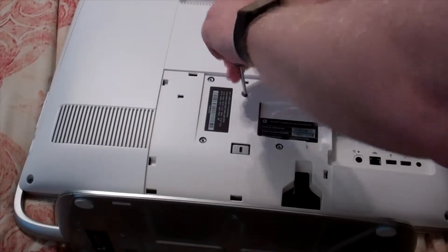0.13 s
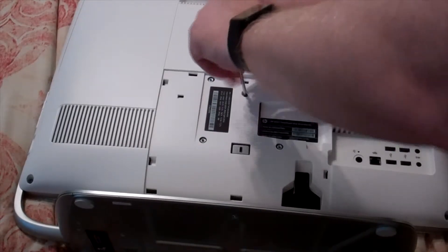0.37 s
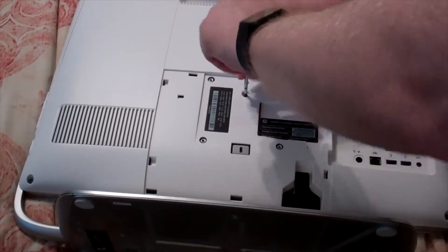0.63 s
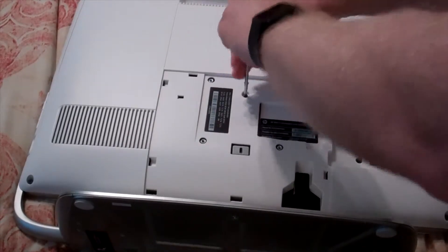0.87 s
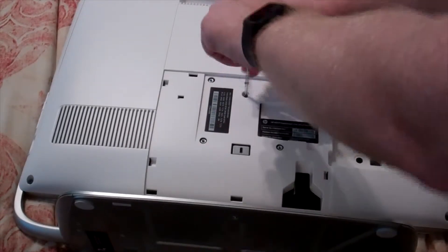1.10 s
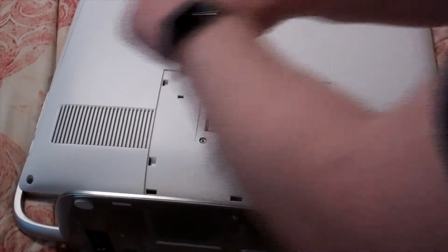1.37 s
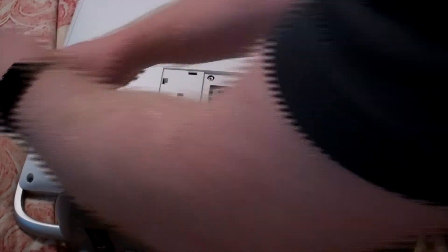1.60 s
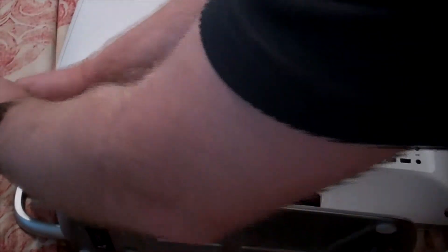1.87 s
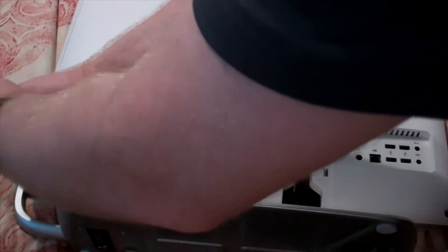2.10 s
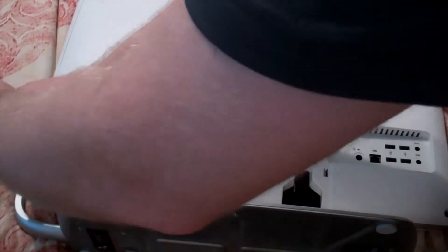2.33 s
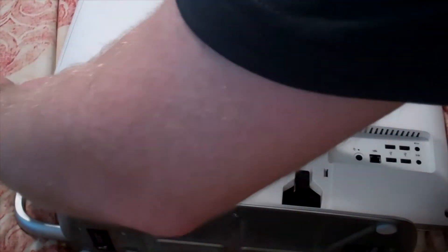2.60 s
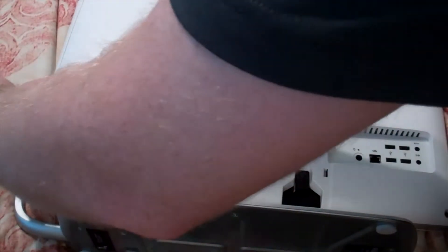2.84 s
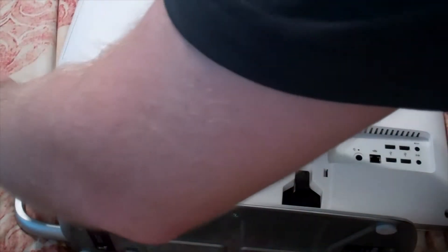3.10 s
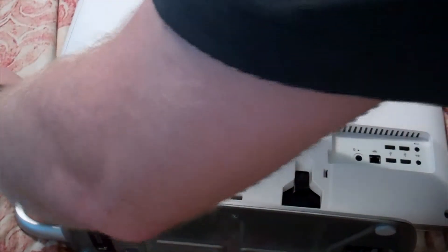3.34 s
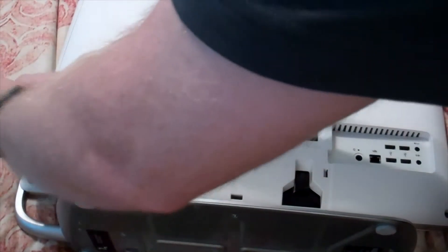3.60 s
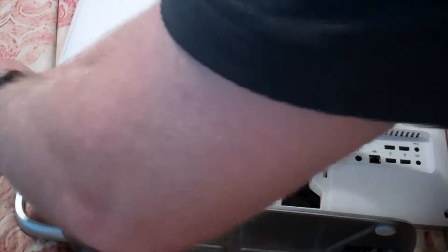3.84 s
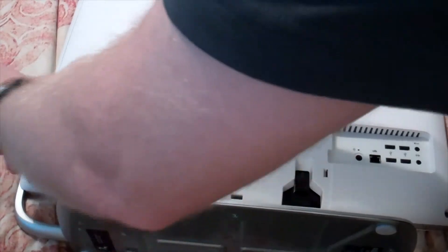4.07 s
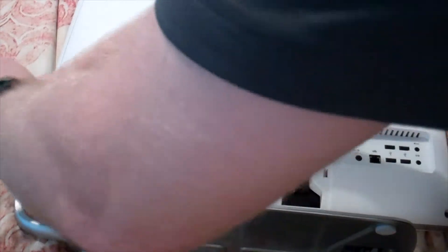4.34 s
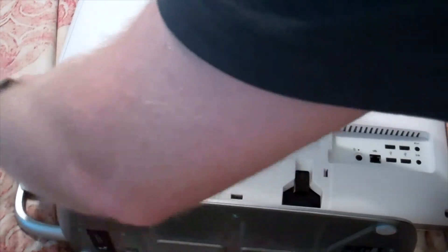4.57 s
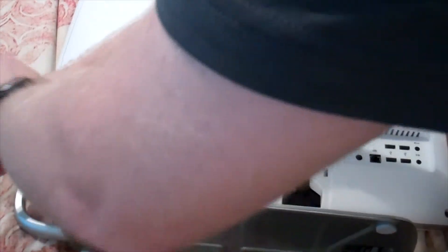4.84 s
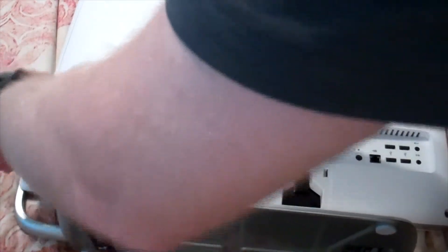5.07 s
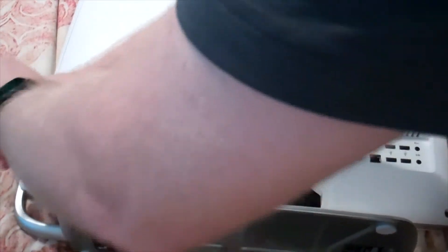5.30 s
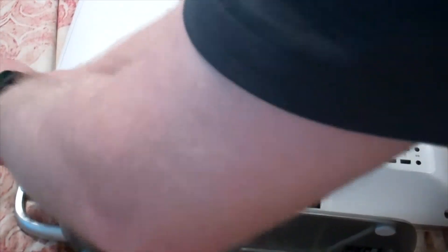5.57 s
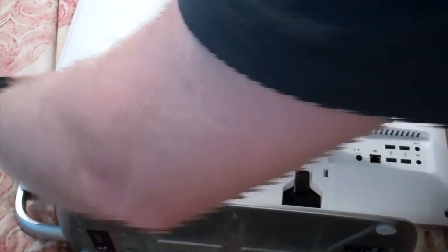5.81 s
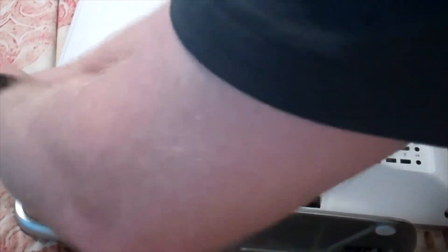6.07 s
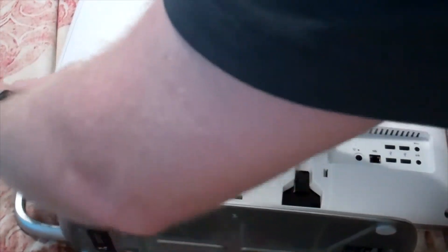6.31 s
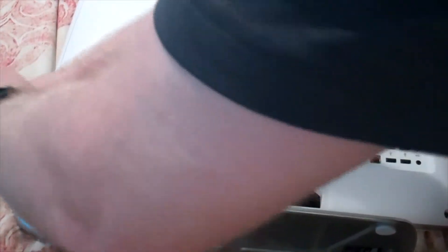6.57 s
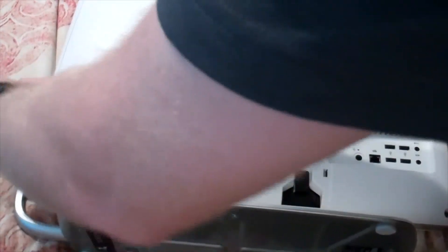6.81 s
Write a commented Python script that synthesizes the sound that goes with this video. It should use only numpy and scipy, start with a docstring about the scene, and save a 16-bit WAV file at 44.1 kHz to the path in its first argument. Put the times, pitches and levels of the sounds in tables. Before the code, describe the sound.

Close stereo microphone in a quiet furnished room with steady hiss and a faint high whine. A screwdriver bit rubs faintly in a screw, then snaps loudly twice on a hollow plastic case. A sleeve swishes past, followed by clustered taps and short scrapes, a sparse softer stretch, and finally spaced hard cracks with small clicks between them.

```python
"""A small screwdriver backs screws out of the plastic cover of a hollow case: its bit slips and snaps,
taps and scrapes. Each touch is a rough push that sets case, cover, bit and steel ringing as dying sines.
Dragging is many tiny slips; thread squeaks are narrow noise; a sleeve swishes past once as cloth noise.
Sparse echoes make a quiet furnished room, over steady hiss and a faint high whine.
The close stereo microphone's level ducks after loud snaps, and the highest peaks clip."""
import sys
import numpy as np
from scipy import signal
from scipy.io import wavfile
from scipy.ndimage import uniform_filter1d

SR = 44100
rng = np.random.default_rng(int(sys.argv[2]) if len(sys.argv) > 2 else 0)


def put_to_file(sound):
    """Save the sound as 16-bit audio at rate SR, in the file named by the first command-line argument."""
    columns = np.atleast_2d(sound).T  # one column per channel
    safe = np.clip(columns, -1, 1)
    whole_steps = np.round(safe * 32767)
    wavfile.write(sys.argv[1], SR, whole_steps.astype(np.int16))


def decibels_to_gain(level_db):
    """Convert a level in decibels to a linear amplitude gain (20 dB per decade)."""
    exponent = np.asarray(level_db, float) / 20
    return 10 ** exponent


N = 305602

# single contacts: t/s, knock of the cover/dB, boom of the hollow case/dB, snap of steel on steel/dB
TOUCHES = [(0.169, -42, -43.5, -43.5), (0.23, -43, -35.5, -46), (0.272, -36.5, -42, -42.5),
           (0.609, -14.5, -13.5, -3.5), (0.95, -49, -42.5, -47), (1.033, -13.5, -15, -4),
           (1.146, -43.5, -61, -36.5), (1.876, -30, -24, -42), (1.955, -33.5, -31, -43),
           (1.988, -20.5, -22.5, -28.5), (2.064, -34.5, -39, -32), (2.076, -21, -24, -28.5),
           (2.127, -29.5, -58, -40.5), (2.412, -33.5, -64, -43), (2.419, -21.5, -25.5, -24),
           (2.468, -20.5, -27, -31.5), (2.529, -30, -29, -58), (2.653, -27, -35, -38),
           (2.662, -19, -23, -27), (2.829, -32, -38.5, -45), (2.851, -27, -31, -53),
           (2.918, -44.5, -35, -40), (3.098, -25, -29.5, -36), (3.286, -51, -48, -47),
           (3.388, -55, -49, -58), (3.792, -44.5, -47.5, -43.5), (3.839, -50, -36, -62),
           (3.968, -45, -40, -73), (4.072, -46.5, -36, -59), (4.314, -31.5, -29.5, -41.5),
           (4.455, -41.5, -39, -44.5), (4.539, -60, -41, -51), (4.596, -36, -37, -39.5),
           (4.709, -44, -28, -58), (4.744, -33.5, -36, -40), (4.826, -41.5, -42.5, -37),
           (4.853, -12, -23.5, -12.5), (5.03, -40, -41.5, -38.5), (5.123, -44.5, -46, -42.5),
           (5.225, -48, -47, -48), (5.259, -45, -52, -48), (5.303, -38.5, -39, -54),
           (5.337, -10, -24, -8.5), (5.615, -69, -45, -49.5), (5.777, -37, -39, -44),
           (5.865, -25.5, -30.5, -41), (5.899, -13, -26.5, -28.5), (6.054, -48, -52, -54),
           (6.219, -4, -20.5, -4.5), (6.428, -22, -32.5, -32), (6.607, -52, -42, -51),
           (6.664, -33.5, -34.5, -38.5), (6.721, -3.5, -22, -6.5)]
# ringing tones of the hollow case: f/Hz, relative level/dB, time to die by 60 dB/s
CASE_TONES = [(210.4, -13, 0.23), (286.5, -26.5, 0.42), (334.3, -4.5, 0.085), (362, -3.5, 0.12),
              (389.1, 1.5, 0.15), (458.4, 3, 0.094), (497.4, 1.5, 0.15), (527.7, 7, 0.034),
              (532, -38, 0.071), (670, -10.5, 0.088)]
# ringing tones of the plastic cover: f/Hz, relative level/dB, time to die by 60 dB/s
COVER_TONES = [(741, -15.5, 0.15), (891, -3.5, 0.052), (990, -8, 0.075), (1100, -14, 0.2),
               (1262, -0.5, 0.018), (1398, -9, 0.016), (1383, 5, 0.011), (1560, 4, 0.017),
               (1724, -5.5, 0.039), (1855, 1.5, 0.016), (2085, 1, 0.026), (2320, -6, 0.018)]
# ringing tones of the screwdriver bit: f/Hz, relative level/dB, time to die by 60 dB/s
BIT_TONES = [(2653, 5.5, 0.0057), (3120, -3, 0.012), (3247, 0, 0.004), (3450, -0.5, 0.005),
             (4270, 3.5, 0.0027), (4840, -3.5, .004), (5720, 2, 0.0019), (6310, -5, 0.0018)]
# ringing tones of the steel: f/Hz, relative level/dB, time to die by 60 dB/s
STEEL_TONES = [(7800, -5, 0.0021), (9220, 2.5, 0.0027), (10300, -0.5, 0.003), (11660, 5, 0.0023),
               (12920, -7, 0.0075), (13780, -1, 0.0048)]
# colour of the sleeve's cloth noise: f/Hz, relative level/dB
CLOTH_COLOUR = [(200, -28), (500, -16.5), (2000, -17), (5000, -18.5), (7500, -25.5), (10000, -17.5),
                (13700, -7), (16000, -35)]
# colour of the background hiss: f/Hz, relative level per Hz/dB
HISS_COLOUR = [(15, -31), (25, 14), (92, -32), (123, 1), (160, -8), (208, -3), (258, -3), (383, 2.5),
               (541, -7.5), (944, -5.5), (1480, -11), (1830, -9), (2150, -7.5), (2330, -12), (14100, -8)]
# left-right likeness of the background hiss: f/Hz, likeness (0 to 1)
HISS_LIKENESS = [(60, 0.37), (300, 0.73), (1400, 0.34), (3000, 0.011), (14000, 0.0097)]
# how long the room's echoes last: f/Hz, time to die by 60 dB/s
ROOM_DECAY = [(150, 0.48), (400, 0.21), (1000, 0.29), (3000, 0.23), (8000, 0.28), (14000, 0.22)]
# left-right likeness of the echoes: f/Hz, likeness (0 to 1)
ECHO_LIKENESS = [(150, 0.97), (400, 1), (1000, 0.85), (3000, 0.033), (14000, 0.043)]
# faint squeaks of the thread: start t/s, end t/s, f/Hz, width/Hz, level/dB
SQUEAKS = [(.05, 0.607, 2180, 250, -63), (5.438, 5.826, 1560, 120, -63.5), (5.927, 6.16, 1130, 151, -61),
           (6.44, 6.547, 1090, 150, -56)]
# steady pressure of the turning bit: t/s, level felt by the case/dB
PRESSURE = [(0.0, -57.5), (0.3, -56), (0.55, -49.5), (0.77, -60), (1.05, -46.5), (1.3, -68), (1.9, -74.5),
            (2.9, -75.5), (3.4, -57.5), (3.85, -76), (4.4, -55), (5.1, -62.5), (5.3, -43), (5.45, -53.5),
            (5.65, -54), (6.25, -50), (6.46, -64), (6.7, -56), (6.93, -54.5)]
# short scrapes as the bit drags in the slot: start t/s, length/s, level felt by the case/dB
SCRAPES = [(.4, 0.071, -63), (1.877, 0.049, -40), (2.076, 0.094, -41), (2.287, 0.054, -56.5),
           (2.359, 0.059, -54.5), (2.649, 0.07, -37), (2.849, 0.1, -44.5), (3.498, 0.16, -63),
           (3.933, 0.15, -50.5), (4.441, 0.078, -38.5), (4.523, 0.052, -41.5), (4.7, 0.072, -41),
           (4.852, 0.059, -38)]


def evened(x):
    """Scales a sound to rms 1."""
    return x / np.sqrt(np.mean(x ** 2) + 1e-20)


def read(points, hz):
    """Reads a table between its points, on a log-frequency axis."""
    f, value = np.transpose(points)
    return np.interp(np.log(hz + 1), np.log(f + 1), value)


def curve(s, db):
    """Turns a level curve into a gain for every sample."""
    return decibels_to_gain(np.interp(np.arange(N) / SR, s, db))


def add(mix, s, sound):
    """Mixes a sound in at a time in seconds."""
    part = mix[round(s * SR):][:len(sound)]
    part += sound[:len(part)]


def smoothed_twice(x, size):
    """Two running averages turn noise into a slow drift."""
    return uniform_filter1d(uniform_filter1d(x, size=size), size=size)


def noise(colour, same, patchy_db):
    """Stereo noise of a given colour, with slight patches drifting over time and pitch."""
    hz = np.fft.rfftfreq(1024, 1 / SR)
    a, b, c, d, patches = rng.standard_normal((N // 256 + 5, 513, 5)).T
    patches = uniform_filter1d(patches, size=12, axis=0)
    patches = evened(uniform_filter1d(patches, size=14, axis=1))
    same = np.clip(read(same, hz), -1, 1)[:, None]
    left, other = a + 1j * b, c + 1j * d
    # the right side shares part of the left one's noise
    z = np.array([left, same * left + np.sqrt(1 - same ** 2) * other])
    z = z * decibels_to_gain(read(colour, hz)[:, None] + patchy_db * patches)
    return evened(signal.istft(z, nperseg=1024, noverlap=768)[1][:, :N])


def ring(modes, spot_db, sign=1):
    """Dying sines; the struck spot favours some; sign -1 starts neighbours opposed, so the ring swells."""
    hz, db, t60 = np.transpose(modes)[:, :, None]
    t = np.arange(SR // 4) / SR
    start = sign ** np.arange(len(modes))[:, None]
    fading = decibels_to_gain(db + spot_db[:len(modes), None] - 60 * t / t60)
    return (start * fading * np.sin(2 * np.pi * hz * t)).sum(0)


def radiated(x, hz):
    """A small part sends out little sound below its lowest tones."""
    return signal.sosfilt(signal.butter(4, hz, "high", fs=SR, output="sos"), x)


def hiss():
    """The steady stereo hiss of the microphone is coloured random noise."""
    return decibels_to_gain(-50) * noise(HISS_COLOUR, HISS_LIKENESS, patchy_db=-2.2)


def whine():
    """A faint steady whine is one pure sine, alike on both sides."""
    hz, rms_db = 11800, -74
    return decibels_to_gain(rms_db) * np.sqrt(2) * np.sin(2 * np.pi * hz * np.arange(N) / SR)


def room(feeds):
    """Sparse echoes of random sign, each band dying at its own speed; each feed has its own pattern."""
    taps = np.zeros((len(feeds), 2, SR // 2))
    at = np.arange(120, SR // 2 - 10, 10)  # one echo in every 10 samples
    size = len(feeds), 2, len(at)
    np.put_along_axis(taps, at + rng.integers(0, 10, size), rng.choice([-1., 1.], size), 2)
    hz, t, z = signal.stft(taps, SR, nperseg=256)
    same = np.clip(read(ECHO_LIKENESS, hz), 0, 1)[:, None]
    left, other = z[:, 0], z[:, 1]
    z = np.stack([left, same * left + np.sqrt(1 - same ** 2) * other], axis=1)
    fading = decibels_to_gain(-60 * t / read(ROOM_DECAY, hz)[:, None])
    tail = signal.istft(z * fading, SR, nperseg=256)[1]
    tail = tail / np.linalg.norm(tail[0, 0])
    return signal.fftconvolve(feeds[:, None], tail, axes=2).sum(0)[:, :N]


def sleeve():
    """Cloth noise swells as the arm nears, drops as it leaves and rustles on faintly until the arm rests."""
    closest_s, closest_db = 1.383, -39
    nearing, leaving = 33.5, 94  # dB per second
    rustle_db, rest_s = -52, 1.85
    t = np.arange(N) / SR
    slope = np.where(t < closest_s, nearing, leaving)
    sweep = decibels_to_gain(closest_db - slope * abs(t - closest_s))
    rustle = decibels_to_gain(rustle_db) * (t > closest_s) * np.clip((rest_s - t) * 10, 0, 1)
    return np.maximum(sweep, rustle) * noise(CLOTH_COLOUR, [(100, .7), (14000, .5)], patchy_db=1.2)


def squeaks():
    """Fuzzy whistles of the thread: noise through one narrow resonance, wavering in strength."""
    out = np.zeros(N)
    for start, end, hz, width, db in SQUEAKS:
        grain, waver = rng.standard_normal((2, SR))[:, :round((end - start) * SR)]
        tone = evened(signal.lfilter(*signal.iirpeak(hz, hz / width, SR), grain))
        waver = decibels_to_gain(3.1 * evened(smoothed_twice(waver, 1500)))
        add(out, start, decibels_to_gain(db) * tone * waver * signal.windows.tukey(len(tone), .5))
    return out


def rubbing():
    """Uneven slips of the bit: coarse ones ring the case, fine dense ones the cover; steady ones clump."""
    cover_db, cover_follows = -61.5, 0.64  # level at -55 dB of pressure, and dB it rises per dB
    clumps = decibels_to_gain(4.0 * evened(smoothed_twice(rng.standard_normal(N), 900)))
    case = curve(*np.transpose(PRESSURE)) * clumps
    for start, length, db in SCRAPES:  # these run evenly, without clumps
        add(case, start, decibels_to_gain(db) * signal.windows.tukey(round(length * SR), .5))
    cover = decibels_to_gain(cover_db) * (case / decibels_to_gain(-55)) ** cover_follows

    slips = decibels_to_gain(2.8 * np.minimum(rng.exponential(1, N), 4)) * rng.choice([-1, 1], N)
    chance = rng.random(N) * SR
    flat = np.zeros(12)  # no struck spot is favoured
    low = radiated(ring(CASE_TONES, flat, sign=-1), 270)
    high = evened(ring(COVER_TONES, flat)) + decibels_to_gain(-2) * evened(ring(BIT_TONES, flat))
    high = radiated(high, 414)
    out = np.zeros(N)
    for body, gain, slips_per_s in ((low, case, 400), (high, cover, 2500)):
        force = gain * evened(slips * (chance < slips_per_s))
        out += signal.fftconvolve(force, body / np.linalg.norm(body))[:N]
    return out


def touches():
    """Each contact is a rough push, then a brief skid, ringing four parts; returns direct and room-bound sound."""
    contact_s, quickens = 0.0013, 0.067  # contact time scale at -30 dB of knock; dB shorter per dB of knock
    bit_share, bit_db = 0.32, -2.5  # the bit's click lies between knock and snap: share of the snap, offset
    bit_yields = 0.34  # dB the click falls behind per dB of hard blow
    # hard blows pull the cover's ring to one pitch: dB lost per octave away and dB of blow
    focus_hz, focus_from_db, focus = 1430, -15, 1.8
    thump_db, thump_per_snap, thump_per_knock = -18, 3.1, -0.53  # a low one-sided thump under the brightest snaps

    # one value for each of case, cover, bit, steel
    parts, signs = (CASE_TONES, COVER_TONES, BIT_TONES, STEEL_TONES), (-1, 1, 1, 1)
    lowest_hz = 250, 620, 1900, 5500
    grain = 1.27, 6.7, 37, 9  # heavy parts feel the push, light ones its grit; the cover only that of a skid
    brief = 2.4, 15.4, 1.4, 3  # how early in the contact each part has taken its push
    spread_db = -8.5, -3.5, -2.5, -7.5  # share of each part that reaches the walls
    uneven_db = 4.2, 6.3, 3.3, 1.7  # how much the struck spot changes each part's colour

    out, around = np.zeros(N), np.zeros((3, N))
    t = np.arange(3000) / SR
    grit = rng.standard_normal((len(TOUCHES), 2, len(t)))
    spots = rng.standard_normal((len(TOUCHES), 4, 12))
    low_thump = np.exp(-t / 0.0015) * (1 - np.exp(-t / .0001))
    octaves_away = abs(np.log2(np.array(COVER_TONES)[:, 0] / focus_hz))
    for n, (row, (rough, lumps), spot) in enumerate(zip(TOUCHES, grit, spots)):
        s, knock_db, boom_db, snap_db = row
        s = s + .0015  # each contact starts 1.5 ms after its listed time
        u = t / contact_s * decibels_to_gain(quickens * (knock_db + 30))
        skid = min(.06 * decibels_to_gain(-.9 * (knock_db + 11.5)), .8)  # light touches skid on, hard blows are clean
        jolts = decibels_to_gain(4.05 * evened(uniform_filter1d(lumps, size=90)))
        press = np.sqrt(u) * np.exp(-u)
        drag = jolts * np.exp(-t / 0.0092) * (1 - np.exp(-t / 0.0023))
        shape = (1 - skid) * press + skid * drag

        hard_db = max(knock_db - focus_from_db, 0)
        click_db = knock_db + bit_share * (snap_db - knock_db) + bit_db - bit_yields * hard_db
        focus_loss_db = focus * hard_db * octaves_away
        for k, db in enumerate((boom_db, knock_db, click_db, snap_db)):
            is_cover = k == 1
            roughness = grain[k] * (skid if is_cover else 1) * rough
            force = shape * (brief[k] * np.exp(-brief[k] * u) + roughness)
            spot_db = uneven_db[k] * spot[k] - is_cover * focus_loss_db
            body = radiated(ring(parts[k], spot_db, signs[k]), lowest_hz[k])
            sound = signal.fftconvolve(force, body)
            sound = decibels_to_gain(db) * sound / np.sqrt(2 * uniform_filter1d(sound ** 2, size=200).max())
            add(out, s, sound)
            # the walls get the part's smooth ring at equal energy, without the push's grit
            smooth = np.linalg.norm(sound) / np.linalg.norm(body) * body
            add(around[n % len(around)], s, decibels_to_gain(spread_db[k]) * smooth)
        add(out, s, decibels_to_gain(thump_db + thump_per_snap * snap_db + thump_per_knock * knock_db) * low_thump)
    return out, around


def scene():
    """Mixes background, room and work; the work reaches the nearer side of the microphone one sample early."""
    move_s = 1.5  # the hands move from the right-hand screw to the left-hand one
    hits, around = touches()
    rub = rubbing() + squeaks()
    work = hits + rub
    late = np.roll(work, 1)
    at_right = np.arange(N) < move_s * SR
    direct = np.array([np.where(at_right, late, work), np.where(at_right, work, late)])
    direct = direct * decibels_to_gain([[.5], [-.5]])  # left a little louder, right a little softer
    echoes = room(around + decibels_to_gain(-10) * rub)
    return direct + echoes + sleeve() + whine() + hiss()


def band_limit(x):
    """A steep low-pass at the top of the band."""
    return signal.sosfilt(signal.butter(12, 15380, fs=SR, output="sos"), x)


def record(dry):
    """Gain control ducks after loud snaps and recovers slowly; peaks clip, then the top treble is cut."""
    threshold_db, duck_per_db = -32, 0.27
    power_db = 10 * np.log10(abs(uniform_filter1d((dry ** 2).mean(0), size=400)) + 1e-12)
    fall = np.arange(N) * 63.0 / SR  # the held loudness sinks by 63 dB a second
    held_db = np.maximum.accumulate(power_db + fall) - fall
    over_db = np.maximum(held_db - threshold_db, 0)
    over_db = signal.lfilter([.0004], [1, .0004 - 1], over_db)  # the gain falls over some 60 ms
    clipped = np.clip(dry / decibels_to_gain(duck_per_db * over_db), -1, 1)
    band = signal.firwin(255, 14250, window=("kaiser", 7), fs=SR)  # top of the microphone's band in Hz
    mix = signal.oaconvolve(clipped, band[None], "same", axes=1)
    return band_limit(mix)


dry = scene()
out = record(dry)
put_to_file(out)
```